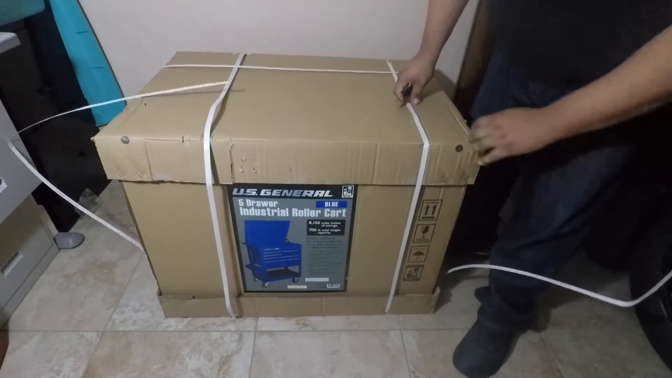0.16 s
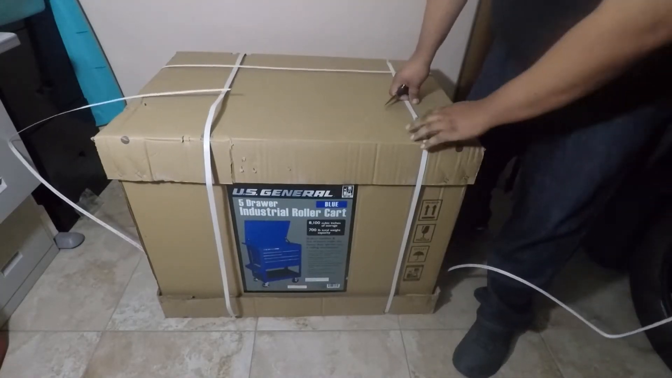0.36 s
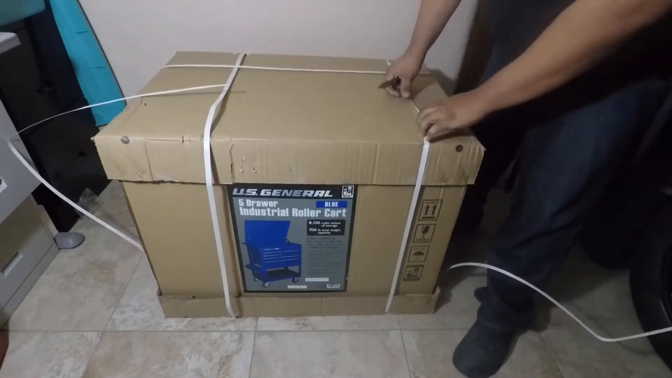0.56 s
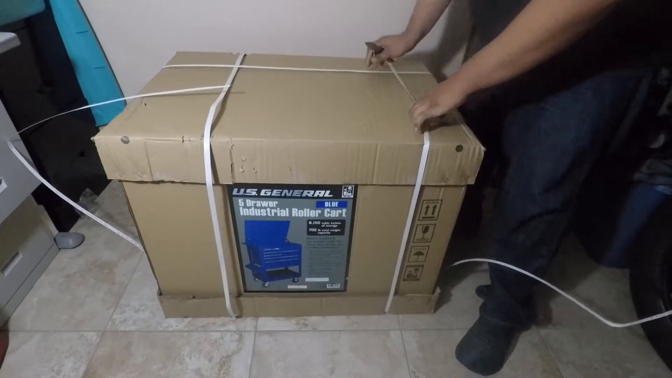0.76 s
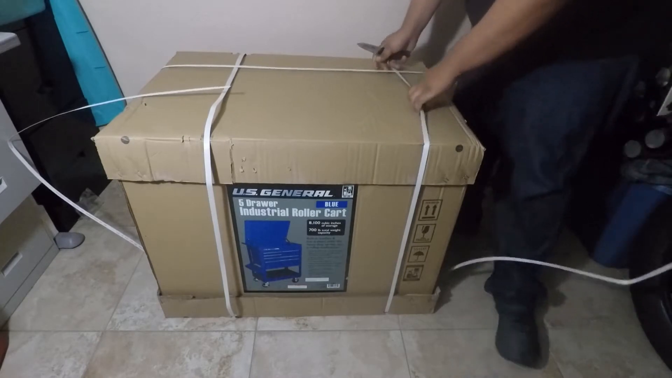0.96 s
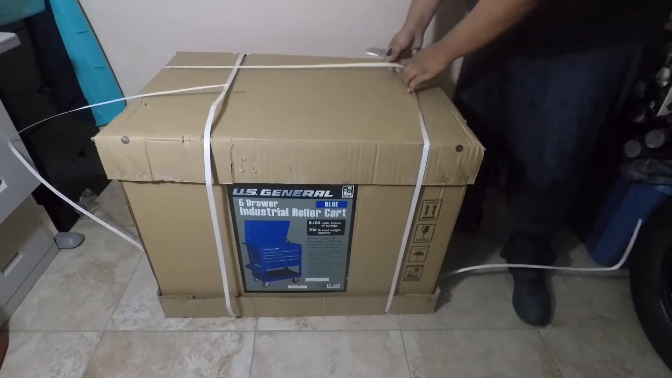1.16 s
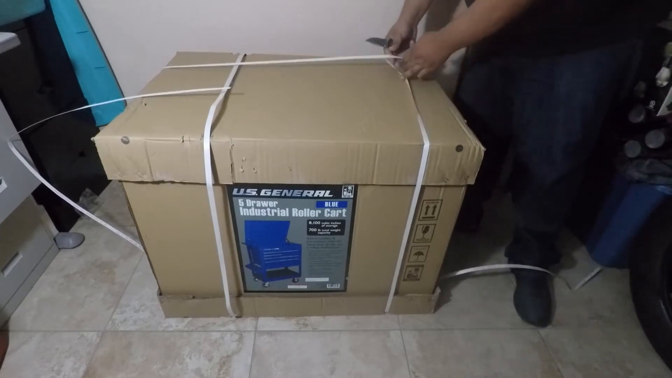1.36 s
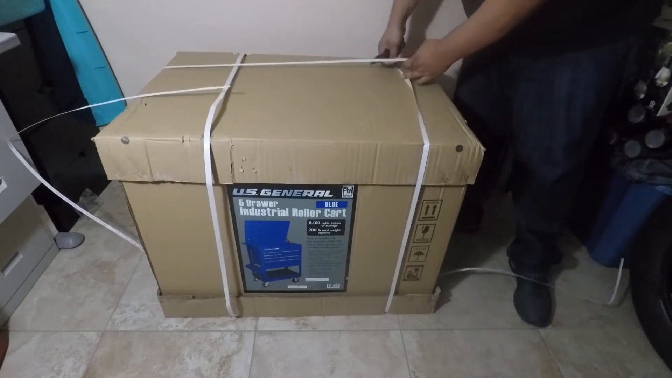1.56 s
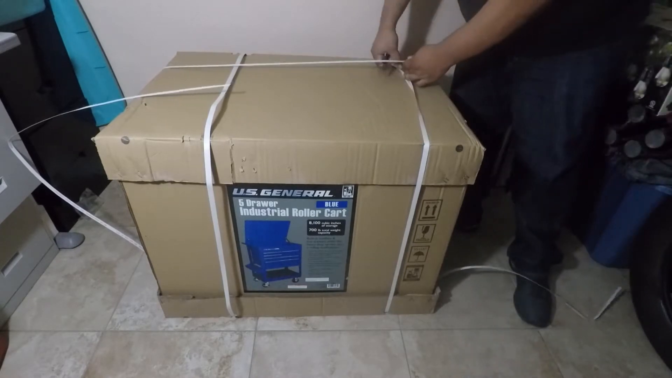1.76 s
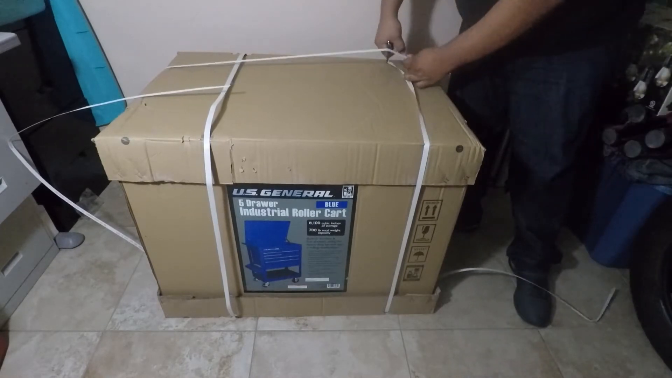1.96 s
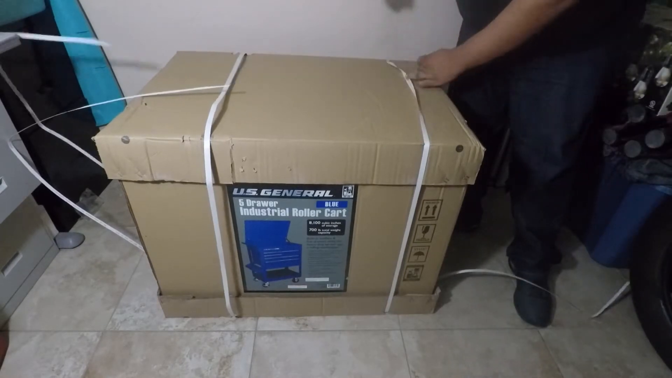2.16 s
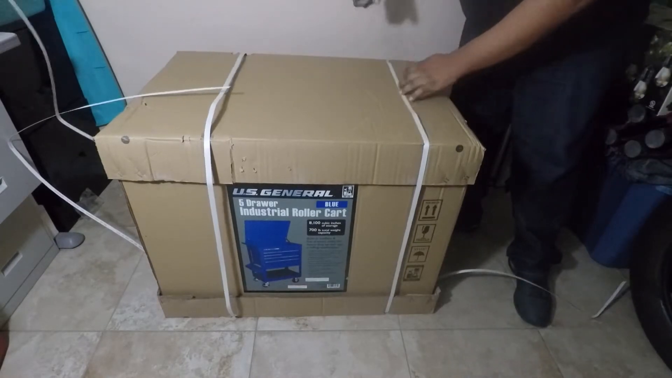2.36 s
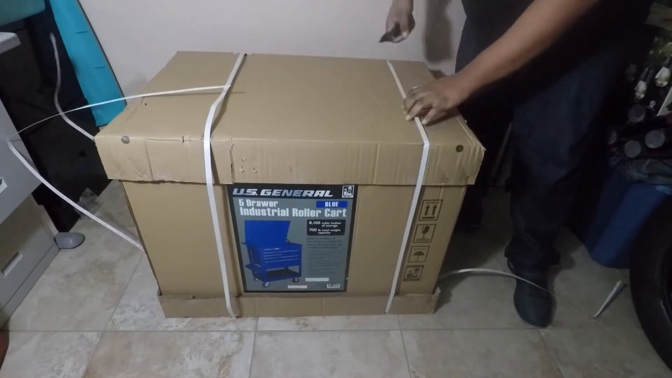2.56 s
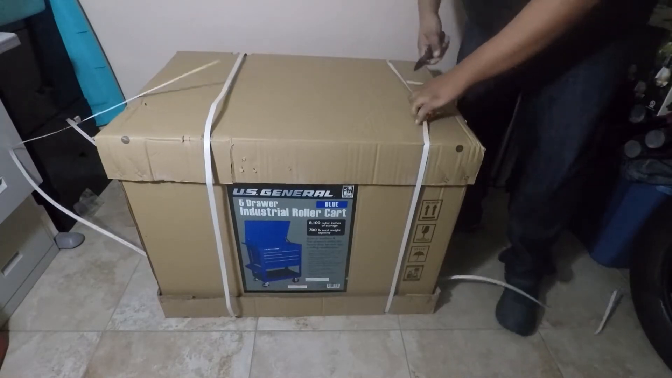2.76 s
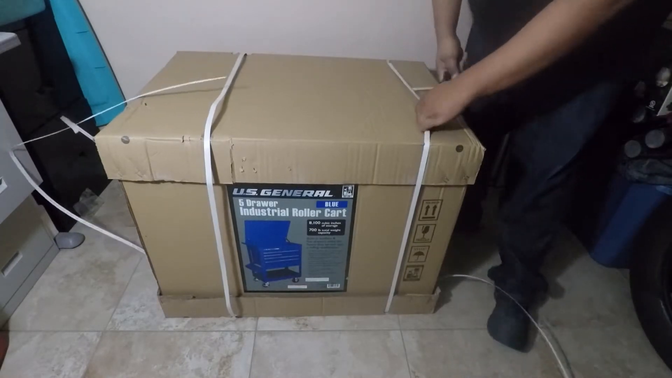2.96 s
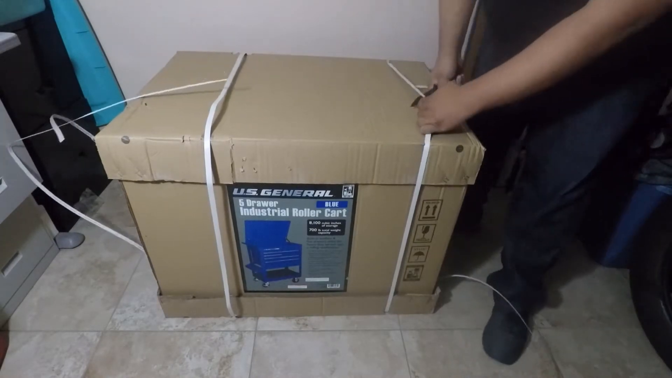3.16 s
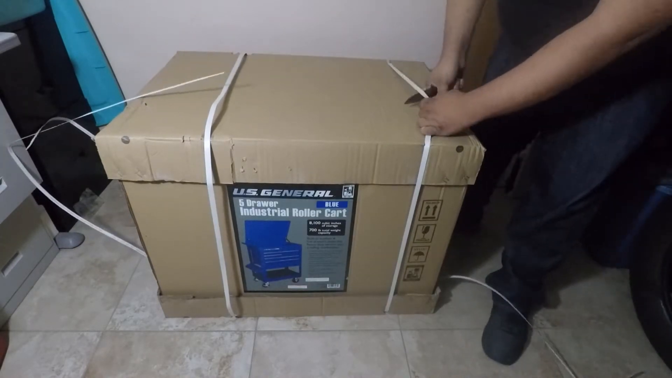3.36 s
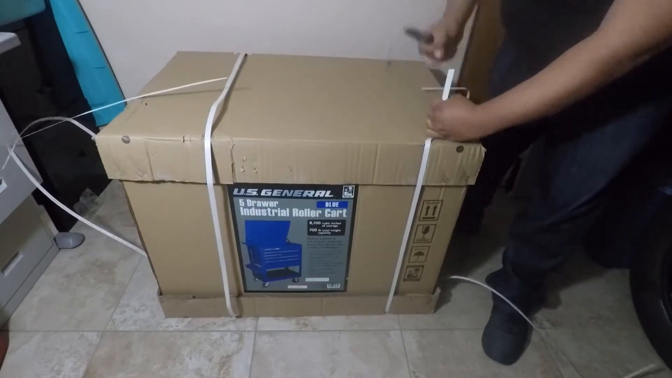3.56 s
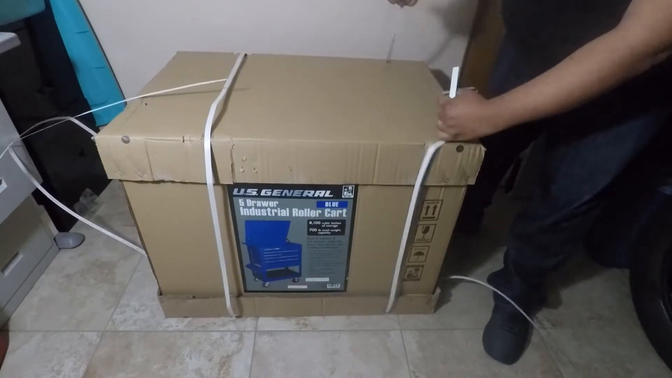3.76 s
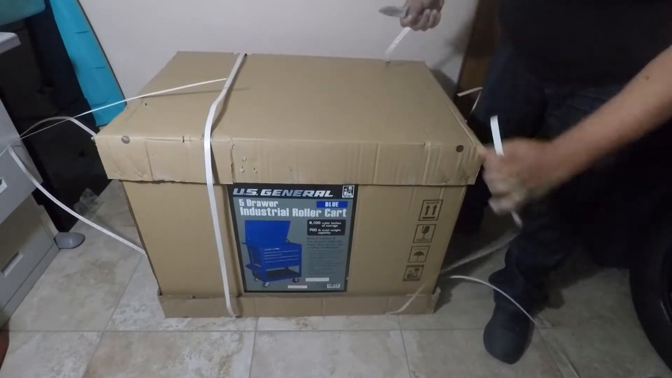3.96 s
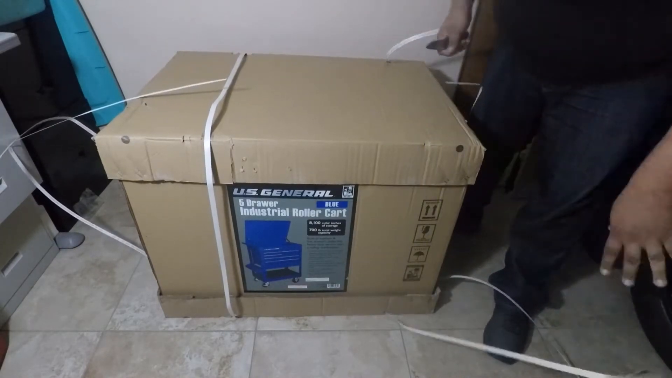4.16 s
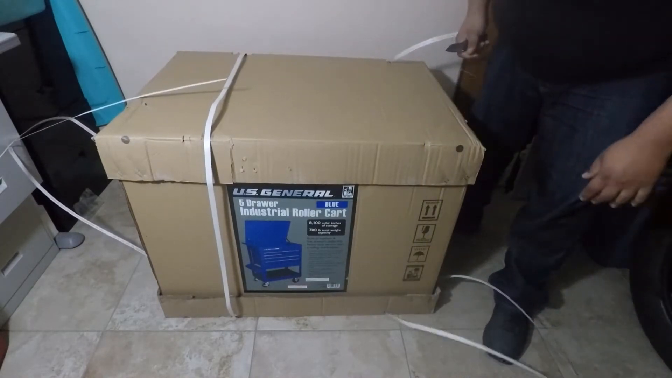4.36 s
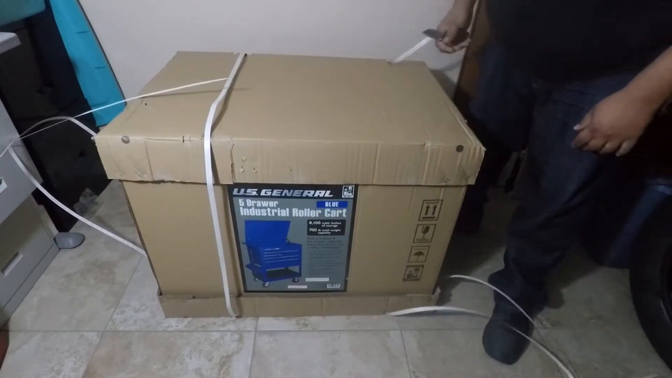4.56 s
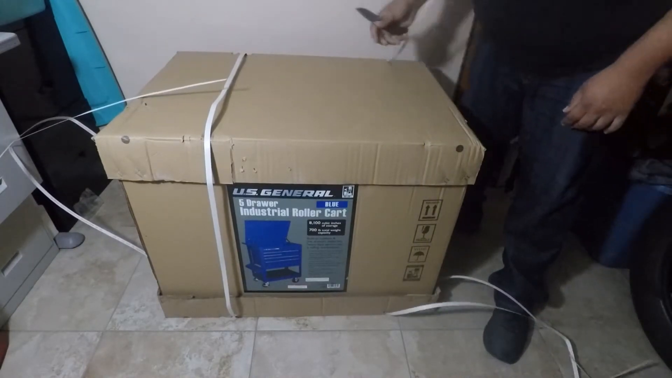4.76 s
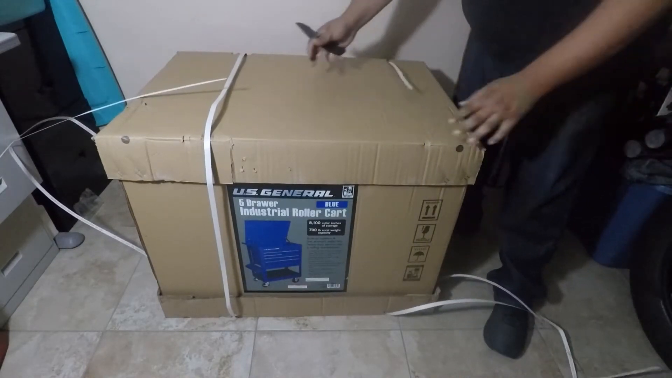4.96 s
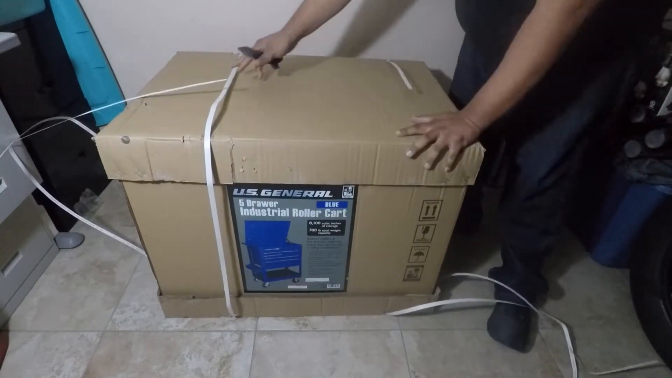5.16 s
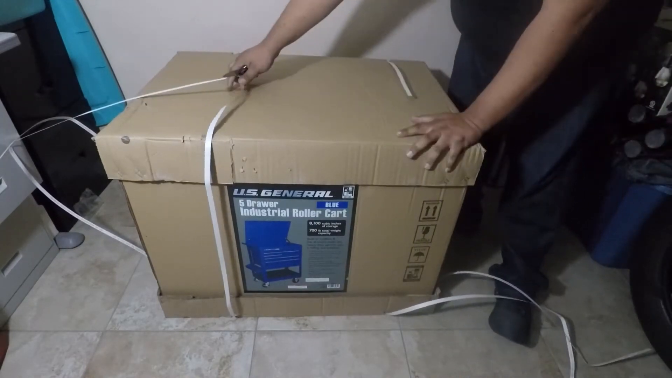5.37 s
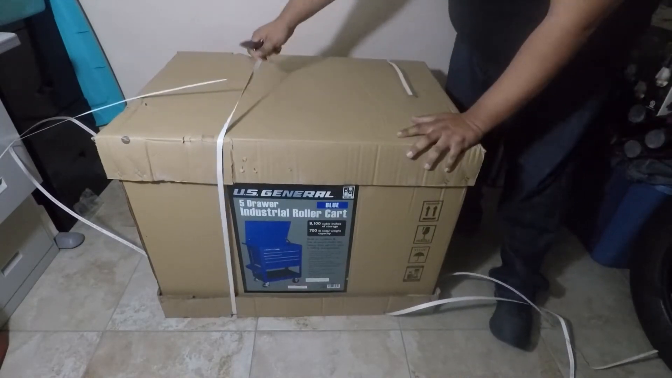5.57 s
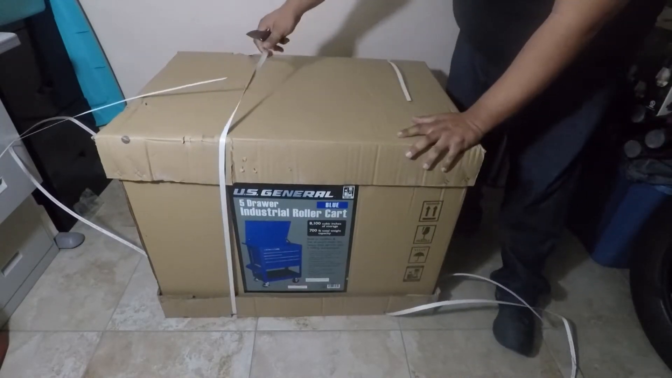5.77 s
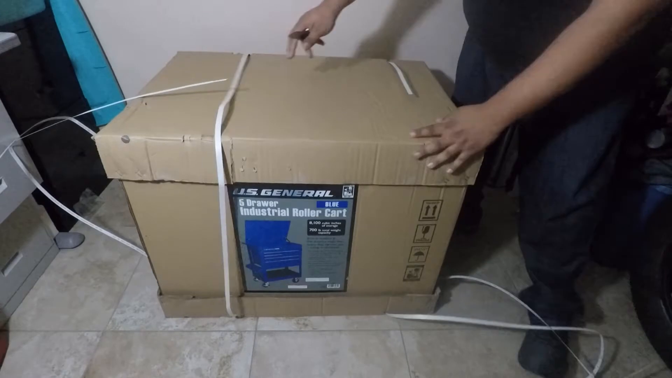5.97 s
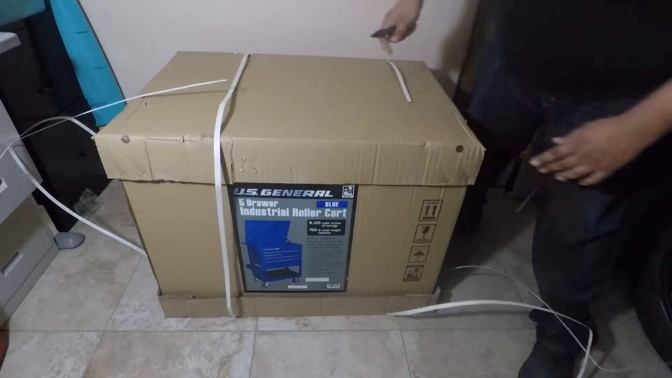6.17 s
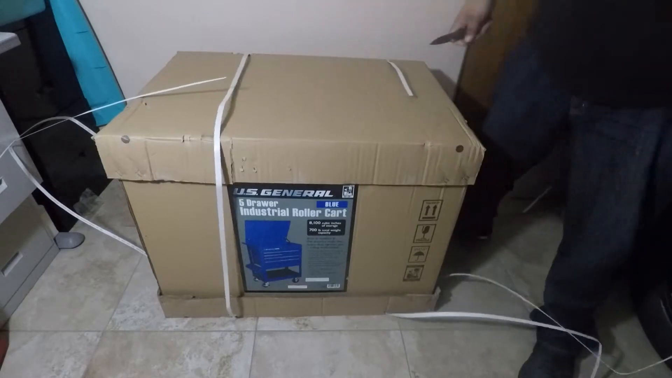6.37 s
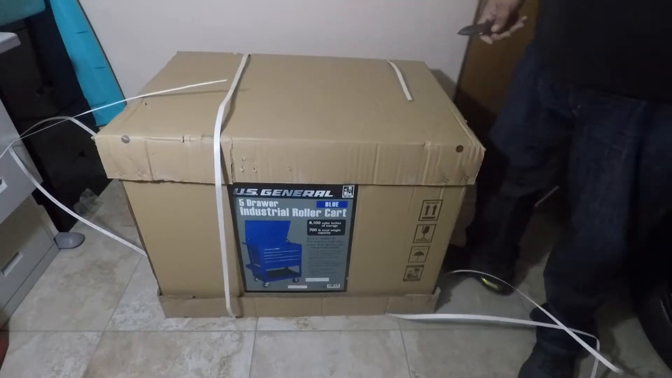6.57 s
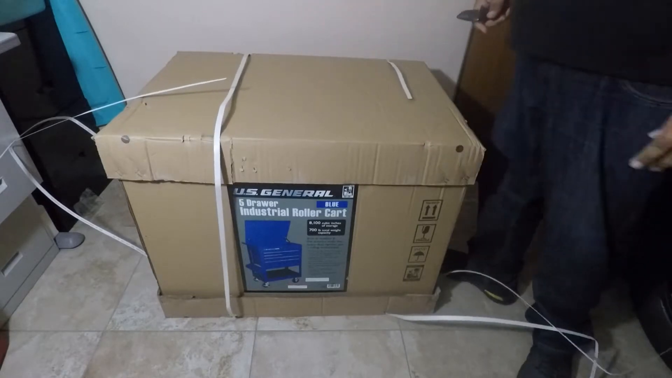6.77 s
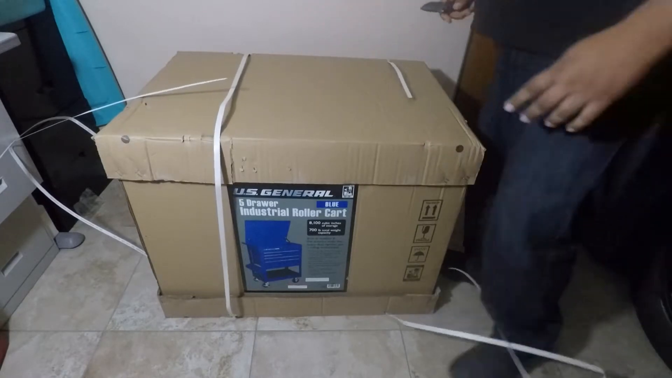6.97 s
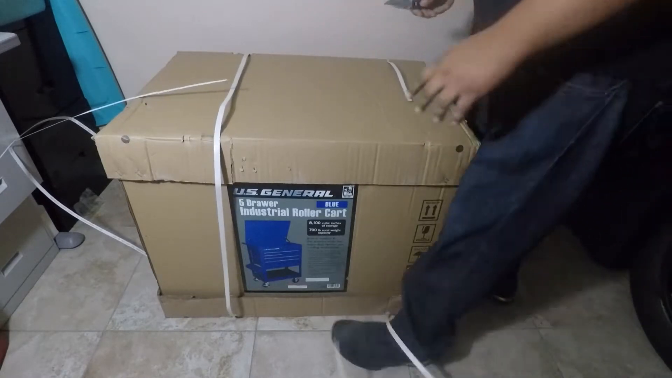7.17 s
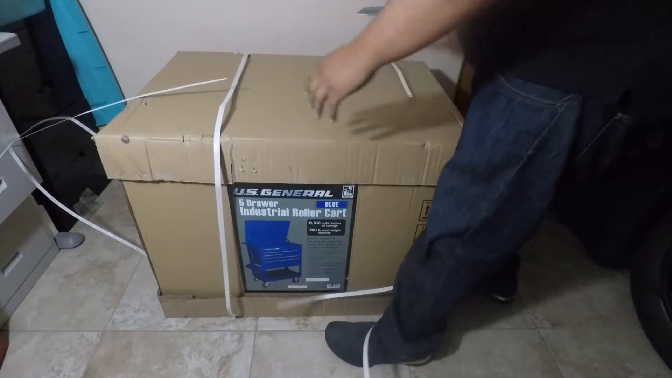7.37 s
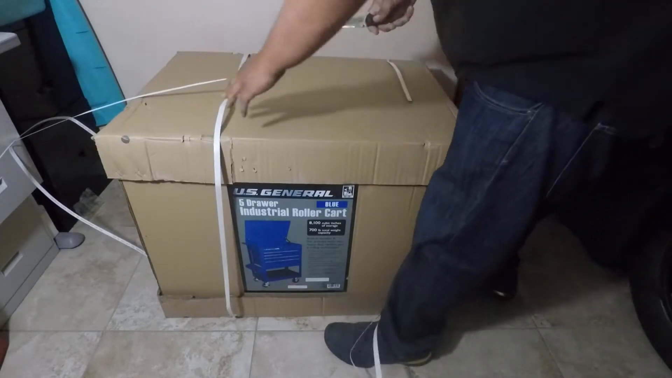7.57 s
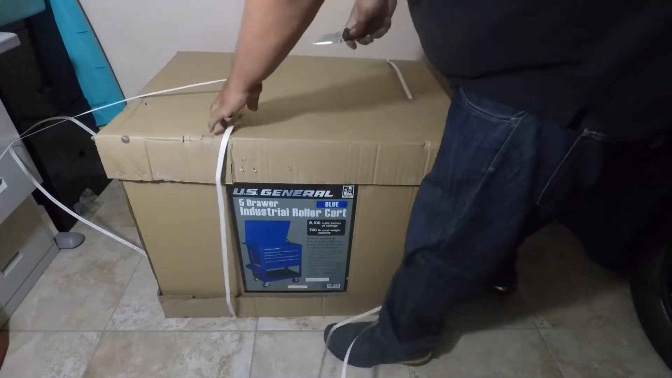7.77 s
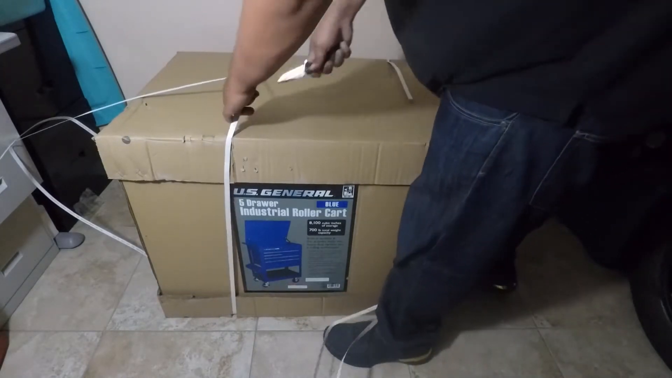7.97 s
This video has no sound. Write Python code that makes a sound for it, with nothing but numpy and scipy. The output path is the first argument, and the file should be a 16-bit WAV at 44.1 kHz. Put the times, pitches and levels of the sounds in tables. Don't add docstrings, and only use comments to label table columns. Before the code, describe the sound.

In a small tiled room, tight straps snap loudly off a big carton, which drums; loose ends thrum, tick and drag.

```python
import sys
import numpy as np
from scipy import signal
from scipy.fft import rfft, irfft
from scipy.io import wavfile
from scipy.ndimage import uniform_filter1d

SR = 44100
rng = np.random.default_rng(int(sys.argv[2]) if len(sys.argv) > 2 else 0)


def attenuation_scalar(level_db):
    decades = np.asarray(level_db, float) / 20
    return 10 ** decades


def materialize(psi):
    bounded = np.clip(np.atleast_2d(psi).T, -1, 1)
    quanta = np.round(bounded * 32767).astype(np.int16)
    wavfile.write(sys.argv[1], SR, quanta)


N = 353682

# (time [s], peak level [dB], box drumming [dB], sizzle [dB], crack centre [Hz])
STRAP_SNAPS = [
    (0.001, -21.5, -10.5, -10, 960),
    (2.0428, 0, -8.5, -15, 744),
    (2.0479, -0.5, -12, -25, 1250),
    (2.089, -9.5, -41, -12, 1210),
    (3.5237, 6.5, -18, -19.5, 960),
    (3.5285, -2.5, -10.5, -19, 2840),
    (3.614, -13, -15.5, -11, 1040),
    (5.119, -27.5, 0, -9.5, 1130),
    (5.635, -27, -17, -9.5, 2310),
    (5.919, -8, -13.5, -16, 1140),
]
# (time [s], peak level [dB], box drumming [dB], sizzle [dB], crack centre [Hz])
STRAP_WHIPS = [(2.366, -35.5, -20.5, -4.5, 5540), (5.907, -38.5, 1, -15, 1200), (5.919, -9, -14, -3, 1500),
               (5.9283, -24, -25, 7, 7000), (5.936, -30, -19.5, 6, 8000), (7.9687, -39, -15, -1, 5000),
               (1.344, -32, -7, -7.5, 5070), (2.657, -32, -13, -12, 4030), (3.314, -45.5, -25, 2, 7990),
               (3.914, -30, -5, -4, 2130), (4.323, -21, -24, -27, 3730), (4.631, -37.5, -21.5, -10, 3870),
               (4.906, -20, -21, -6, 5530), (4.945, -30.5, -12.5, -4, 795), (7.275, -38.5, -30, -6, 8080),
               (7.346, -14.5, -17.5, -8.5, 3100), (7.356, -15.5, -19, -30, 1530),
               (7.7568, -35, -8.5, 1, 640), (7.9175, -29, -25, -4, 3300), (4.936, -38, -20, 0, 6000),
               (5.018, -44, -20, 0, 6000), (1.329, -38, -20, 0, 6000)]
# (time [s], peak level [dB], box drumming [dB], sizzle [dB])
KNIFE_TAPS = [(1.319, -32.5, -6.5, -7), (1.705, -43, -23, -6), (1.735, -33, -15, -16),
              (1.753, -30, -13, -7.5), (2.372, -30, -12, -31), (2.813, -32, -15, -3),
              (3.752, -38, -10, -28), (3.797, -46, -13, 0), (5.093, -43, 1.5, -4), (5.267, -48, -2, -10),
              (5.323, -44.5, -0.5, 2), (6.674, -44, -11, -19), (7.125, -45.5, -10, -13.5)]
# (time [s], peak level [dB], box drumming [dB], sizzle [dB])
EDGE_CATCHES = [(0.8504, -38, 4, -3), (1.297, -46, -13, -16), (1.56, -33, -6.5, -20),
                (1.908, -46.5, -27, -0.5), (2.284, -31.5, -13, 0), (2.889, -36, -19, -3),
                (3.055, -41.5, -8, 2.5), (3.242, -44, -14.5, -4), (4.52, -40.5, -33.5, -2),
                (4.591, -46.5, -22, -2), (4.79, -52, -20, 5), (4.83, -41.5, -11.5, -23),
                (6.196, -44, -22, -18), (6.608, -37.5, -14.5, -9), (7.157, -38, -19.5, -26),
                (7.181, -36, -11, -22), (7.895, -49, 10.5, -17)]
# (time [s], peak level [dB], box drumming [dB], sizzle [dB], contact [ms])
FIBRE_NICKS = [(0.488, -41.5, -18, -1, 28), (1.974, -38, -10, -15, 11), (2.035, -35, -7.5, 2, 9.5),
               (2.429, -47.5, -18.5, 11, 18), (3.521, -33, -8.5, 0, 5.6), (4.316, -33.5, -21.5, -20, 2.9),
               (5.375, -50, -9.5, 12, 16), (5.425, -34, 2, -16, 21), (5.452, -43, -18, 13, 11),
               (5.897, -38.5, -8, -2, 10), (7.211, -41, -7, -25, 4.3), (7.265, -56, -15, 12.5, 37)]
SNAP_MS, WHIP_MS, TAP_MS, CATCH_MS = 2.67, 1.1, 1.6, 2.0
TAP_HZ, CATCH_HZ, NICK_HZ = 960, 1400, 1500
# (level under the blow [dB], reverberation [s])
BLOW_ECHO = [(-9, 0.21), (-15, 0.28), (-12, 0.13)]
# (frequency [Hz], level [dB], four times the ring [s])
BOX_MODES = [(63.2, -20, 0.18), (93.6, -2.5, 0.11), (186, 2, 0.1), (307, 1, 0.1), (480, 2.5, 0.072),
             (575, 1.5, 0.13), (700, -5, 0.098), (800, -2.5, 0.086), (971, -19, 0.2), (1090, -15, 0.21),
             (1337, -21, 0.26), (1160, -16, 0.19), (1408, -15, 0.32)]
# (time [s], peak level [dB], frequency [Hz], ring [s])
PANEL_RINGS = [(2.0435, -10, 468.5, .12), (2.044, -12, 581, .05), (2.045, -21, 700, 0.15),
               (2.045, -18, 1068, .18), (2.044, -17.5, 1254, 0.12), (2.043, -18, 2880, .035),
               (3.5245, -15.5, 784, 0.13), (3.5247, -15.5, 1126, 0.11), (3.525, -22, 1440, .18),
               (3.5249, -15.5, 2640, .08), (3.526, -20.5, 3190, .08), (3.525, -25, 3760, .08),
               (3.53, -21, 466, .15), (3.53, -20.5, 614, .15), (5.92, -21, 510, 0.1),
               (5.92, -21, 650, 0.087)]
# (time [s], peak level [dB], pitch [Hz], swell [ms], ring [s])
STRAP_THRUMS = [(0.403, -41.5, 168, 5.2, 0.093), (0.617, -45.5, 311, 21, 0.23),
                (0.853, -27.5, 272, 11, 0.066), (0.877, -22.5, 282, 4.4, 0.017),
                (2.046, -8, 298, 1.3, 0.089), (2.047, -11.5, 163, 6.4, 0.051), (2.049, -26, 59, 11, 0.25),
                (5.118, -35, 96, 8.2, 0.15), (2.17, -37, 172, 6.1, 0.8), (2.813, -34, 307, 4.8, 0.063),
                (3.528, -14, 100, 8.2, 0.083), (5.093, -33.5, 260, 11, 0.053), (5.12, -19, 270, 7.7, 0.015),
                (5.268, -33.5, 264, 8.8, 0.054), (5.382, -30.5, 267, 3, 0.053),
                (5.4523, -17, 237.5, 4, 0.12), (5.456, -10.5, 246, 16, 0.03), (5.487, -27, 272, 5.6, 0.14),
                (5.92, -8.5, 300, 1.5, 0.039), (5.934, -20.5, 307, 8, 0.19), (3.532, -12, 215, 5.6, 0.11),
                (7.757, -36, 268, 5, 0.045)]
THRUM_SAG_PER_S = .2
# (time [s], peak level [dB], centre [Hz], width [Hz], dying [s])
STIFF_RINGS = [(4.323, -21, 7970, 1700, 0.36), (7.346, -18.5, 4000, 490, 0.14),
               (7.345, -18.5, 2360, 500, 0.1), (7.346, -23, 1470, 400, 0.2), (7.346, -24.5, 660, 330, 0.17),
               (3.914, -39, 2200, 330, 0.23), (5.2, -39, 760, 450, .12), (1.561, -35, 3880, 610, 0.23),
               (2.4, -57, 6300, 1500, 0.11), (7.158, -39.5, 1430, 570, 0.14),
               (2.044, -13.5, 1230, 300, 0.37), (3.525, -12, 780, 410, 0.19), (7.35, -28, 2700, 4300, .6),
               (4.93, -40, 770, 600, .2), (3.8, -26, 800, 750, 0.32), (4.323, -32.5, 2530, 660, 0.2)]
# (time [s], peak level [dB], centre [Hz], swell [ms], dying [s])
STRAP_CHATTERS = [(.56, -33, 5430, 3, 0.13), (.56, -39, 8060, 5, .1), (.59, -41.5, 843, 23, 0.33),
                  (.505, -45, 1300, 9, 0.25), (.872, -43, 8500, 8, .12), (1.1, -41, 4470, 8, 0.14),
                  (2.231, -38, 7000, 8, .12), (2.283, -35.5, 7550, 4, 0.086), (2.44, -34.5, 7800, 10, .12),
                  (2.655, -38.5, 5450, 7, 0.11), (2.664, -38.5, 3480, 12, 0.14), (2.64, -38, 800, 23, 0.27),
                  (2.887, -42, 3040, 4, 0.23), (5.376, -37, 9440, 7, 0.073), (5.452, -30, 6600, 3, 0.22),
                  (5.452, -30, 9900, 2, 0.082), (5.458, -31, 8260, 8.5, 0.09), (6.195, -50, 500, 3, .08),
                  (7.18, -43, 650, 5, .15), (7.2, -50, 2530, 8.8, 0.17), (7.745, -48.5, 12100, 7.1, 0.055),
                  (7.787, -41.5, 5600, 12, .25), (7.8, -44, 7800, 15, .2), (7.79, -45.5, 13000, 8.7, 0.18),
                  (7.893, -43, 600, 4, .08), (.85, -34, 420, 6, .2), (.876, -36, 480, 4, .06),
                  (.405, -43, 300, 6, .15), (5.119, -29, 450, 3, .18), (5.125, -33, 170, 8, .25),
                  (6.674, -44, 720, 3, .08), (4.04, -52, 6500, 5, .06), (4.18, -59, 10200, 30, .6),
                  (6.9, -56, 12000, 25, .3), (6.35, -57, 7500, 20, .25), (7.27, -42, 9500, 6, .25),
                  (2.045, -16, 190, 5, .2), (2.06, -22, 1200, 15, .5), (3.83, -46, 4100, 10, .3),
                  (7.87, -41, 150, 20, .4)]
CHATTER_WIDTH = 0.32
# (full speed from [s], held [s], level [dB], sizzle [dB])
STRAP_SLIDES = [(.25, 0.27, -61.5, -1), (0.431, .06, -55, -1), (.5, 0.11, -49, -3), (.76, 0.09, -58, 1),
                (.875, 0.17, -46.5, 2), (1.05, 0.077, -48.5, 5), (1.16, 0.06, -52.5, 1.5),
                (1.3, 0.11, -57, -11), (1.52, 0.054, -57.5, -2), (1.76, 0.024, -52.5, -6),
                (1.99, 0.021, -45, -13), (2.12, 0.14, -38.5, -6.5), (2.33, 0.051, -50, -7),
                (2.43, 0.14, -47, 1.5), (2.6, 0.041, -50.5, 1), (2.75, 0.034, -52.5, 4),
                (2.669, 0.015, -42, -3), (2.808, 0.014, -42.5, -1), (3.24, 0.13, -61.5, -4),
                (3.48, 0.033, -55.5, -4), (3.66, 0.046, -43.5, -12), (3.8, 0.011, -49.5, -1),
                (4.6, .05, -59.5, -0.5), (4.72, 0.079, -62, -4), (5.03, 0.011, -53, -13),
                (5.1, 0.088, -52.5, -3), (5.392, 0.084, -46.5, 5), (5.599, 0.043, -46.5, -2.5),
                (5.799, 0.019, -47, -5.5), (5.91, 0.13, -46.5, 4), (6.62, 0.041, -56.5, 0.5),
                (7.2, 0.16, -55.5, -2.5), (7.49, .16, -56, -10), (7.78, 0.26, -52, -2.5)]
# (full weight from [s], held [s], level [dB])
PALM_RUBS = [(.08, 0.018, -51), (.33, 0.074, -57.5), (.43, 0.22, -49.5), (.68, 0.059, -62),
             (.87, 0.038, -37.5), (.97, 0.081, -44.5), (1.15, 0.25, -52), (1.77, 0.036, -45),
             (1.95, 0.079, -54.5), (2.15, 0.21, -43.5), (2.45, 0.12, -51.5), (2.58, 0.29, -45),
             (2.81, 0.012, -37.5), (3.04, 0.028, -56), (3.25, 0.012, -45.5), (3.45, .05, -56.5),
             (3.79, 0.01, -45), (4.7, 0.16, -64), (5.15, 0.058, -56), (5.27, 0.088, -51),
             (5.41, 0.061, -38.5), (5.55, 0.069, -46), (5.8, 0.069, -51), (6.19, .012, -57.5),
             (6.67, 0.01, -53.5), (6.8, .02, -59), (7.27, 0.047, -59), (7.52, 0.12, -59), (7.8, 0.024, -45),
             (7.85, 0.13, -47.5)]
# (full weight from [s], held [s], level [dB])
FOOT_SHIFTS = [(.24, 0.068, -60), (.42, 0.068, -50), (.87, .05, -59), (1.02, 0.17, -60), (1.26, 0.14, -54),
               (1.55, 0.082, -63), (1.8, .2, -66), (2.15, 0.08, -43), (2.42, .1, -56), (2.62, .25, -54),
               (3.22, 0.12, -63.5), (3.5, 0.23, -52), (3.9, 0.11, -63), (4.2, .1, -69.5), (5.1, 0.11, -43),
               (5.32, .2, -49.5), (5.6, .15, -50), (5.8, 0.28, -58), (6.2, 0.04, -61.5),
               (6.35, 0.071, -59.5), (4.05, .05, -62.5), (4.4, 0.075, -65), (6.62, .06, -70),
               (6.88, 0.088, -65.5), (7.17, .08, -64), (7.37, 0.11, -60), (7.62, .08, -64),
               (7.74, 0.045, -51), (7.85, .17, -53)]
# (rise [dB per s], fall [dB per s], idle level [dB])
SLIDE_SWELL = (350, 150, -69)
RUB_SWELL = (280, 350, -71)
STEP_SWELL = (300, 190, -76)
PALM_HISS_DB, IDLE_SIZZLE_DB = -9.5, -9
# (frequency [Hz], level [dB per Hz])
CARD_SPECTRUM = [(350, -27.5), (600, -1), (877, -2), (1070, -7.5), (1440, -3), (1770, -7.5), (4090, -7),
                 (4650, -13.5), (8000, -15.5), (10400, -34.5), (17600, -120)]
# (frequency [Hz], level [dB per Hz])
SIZZLE_SPECTRUM = [(3000, -30), (6000, -3), (8000, -4), (10000, -6), (12000, -11.5), (15000, -9)]
# (frequency [Hz], reverberation [s], level [dB])
ROOM_BANDS = [(133.8, 1, 0.5), (251.6, 0.88, 3), (510, 0.41, -0.5), (1040, 0.6, 0), (2160, 0.6, -1),
              (4000, 0.33, -1), (8260, 0.25, -1), (14000, 0.18, -3)]
ROOM_DB, FIRST_ECHO_MS = -11, 1.3
# (frequency [Hz], level [dB per Hz])
AIR_SPECTRUM = [(12, -29.5), (20, -1.5), (33, -23), (64, -23), (115, -31.5), (264, -23.5), (321, -32.5),
                (1700, -37), (5600, -39), (7810, -37), (9220, -43), (15200, -43)]
AIR_DB = -60.5
SWAY_HZ, SWAY_DB = 8, -61
MIC_HZ, MIC_WIDTH_HZ, MIC_DB = 1463, 77, 3


def band(x, hz, width_hz):
    hz = min(hz, SR * .4)
    return signal.lfilter(*signal.iirpeak(hz, hz / width_hz, fs=SR), x)


def band_twice(x, hz, width_hz):
    return band(band(x, hz, width_hz), hz, width_hz)


def ring(x, hz, t60):
    pole = np.exp(2j * np.pi * hz / SR - np.log(1000) / (t60 * SR))
    return signal.lfilter([1], [1, -pole], x).imag


def peak(x, db):
    return attenuation_scalar(db) * x / np.abs(x).max()


def add(bus, s, x):
    i = int(s * SR)
    bus[i:i + len(x)] += x[:N - i]


def swell_and_die(t, swell_ms, t60):
    swell = max(swell_ms, 1) / 1000
    fall = attenuation_scalar(-60 * (t - swell) / max(t60, .01))
    return np.where(t < swell, t / swell, fall)


def contacts():
    rows = [(*r, SNAP_MS) for r in STRAP_SNAPS]
    rows += [(*r, WHIP_MS) for r in STRAP_WHIPS]
    rows += [(*r, TAP_HZ, TAP_MS) for r in KNIFE_TAPS]
    rows += [(*r, CATCH_HZ, CATCH_MS) for r in EDGE_CATCHES]
    rows += [(*r[:4], NICK_HZ, r[4]) for r in FIBRE_NICKS]
    return rows


def box(blow):
    modes = enumerate(BOX_MODES)
    return sum((-1) ** k * attenuation_scalar(db) * ring(blow, hz, 0.25 * t60) for k, (hz, db, t60) in modes)


def snaps():
    rows = contacts()
    t = np.arange(SR // 3) / SR
    noise = rng.standard_normal((len(rows), 3, len(t)))
    build_up = 1 - np.exp(-t / 0.0055)
    echoes = np.array([attenuation_scalar(db - 60 * t / t60) * build_up for db, t60 in BLOW_ECHO])
    out = np.zeros(N)
    for (s, db, box_db, sizzle_db, hz, ms), grit in zip(rows, noise):
        contact = max(ms, .2) / 1000 * np.array([[3.0], [1], [.8]])
        decay = np.maximum(np.exp(-t / contact), echoes * np.sqrt(ms / 2))
        onset = 1 - np.exp(-t / (0.14 * contact))
        low, mid, high = grit * decay * onset
        knock = band(band(low, 300, 600), 410, 800) + attenuation_scalar(-32) * box(low)
        crack = band_twice(mid, hz, 1.1 * hz)
        crack = crack + .5 * band(band(mid, 2200, 4000), 2200, 6000)
        sizzle = band(band(high, 6500, 6200), 6000, 9600) + attenuation_scalar(-8) * band(high, 14000, 3500)
        blow = peak(crack, db - 2.0)
        blow += peak(knock, db + box_db + 4.0)
        blow += peak(sizzle, db + sizzle_db + 2.5)
        add(out, s, blow)
    return out


def panels():
    out, t = np.zeros(N), np.arange(SR // 3) / SR
    for s, db, hz, t60 in PANEL_RINGS:
        turn = 2 * np.pi * hz * t
        pair = np.sin(turn) + 0.31 * np.sin(1.045 * turn)
        first_cycle = np.minimum(t * hz, 1)
        add(out, s, attenuation_scalar(db - 60 * t / t60) * first_cycle * pair)
    return out


def thrums():
    out, t = np.zeros(N), np.arange(SR // 2) / SR
    for s, db, hz, swell_ms, t60 in STRAP_THRUMS:
        shape = swell_and_die(t, swell_ms, t60)
        turn = 2 * np.pi * hz * (t - THRUM_SAG_PER_S * t ** 2 / 2)
        swing = np.sin(turn) + .15 * shape * np.sin(1.9 * turn)
        add(out, s, attenuation_scalar(db) * shape * swing)
    return out


def rings():
    out, t = np.zeros(N), np.arange(SR // 3) / SR
    noise = rng.standard_normal((len(STIFF_RINGS), len(t)))
    for (s, db, hz, width_hz, t60), grit in zip(STIFF_RINGS, noise):
        tick, shimmer = np.exp(-t / .0015), .17 * attenuation_scalar(-60 * t / t60)
        burst = grit * np.maximum(tick, shimmer)
        add(out, s, peak(band_twice(burst, hz, width_hz), db))
    return out


def chatters():
    out, t = np.zeros(N), np.arange(SR // 3) / SR
    noise = rng.standard_normal((len(STRAP_CHATTERS), len(t)))
    for (s, db, hz, swell_ms, t60), grit in zip(STRAP_CHATTERS, noise):
        burst = grit * swell_and_die(t, swell_ms, t60)
        add(out, s, peak(band_twice(burst, hz, CHATTER_WIDTH * hz), db))
    return out


def colour(x, table):
    hz, db = np.transpose(table)
    place = np.log(np.fft.rfftfreq(len(x), 1 / SR) + 1)
    gain = attenuation_scalar(np.interp(place, np.log(hz), db, left=-80))
    return irfft(rfft(x) * gain, len(x)) / np.sqrt(np.mean(gain ** 2))


def grains(per_s, spread_db, bed):
    hits = rng.random(N) < per_s / SR
    clicks = hits * rng.standard_normal(N) * attenuation_scalar(spread_db * rng.exponential(size=N))
    x = bed * rng.standard_normal(N) + clicks / clicks.std()
    return x / x.std()


def flicker(count, depth_db):
    steps = np.repeat(rng.standard_normal(N // count + 1), count)
    return attenuation_scalar(depth_db * uniform_filter1d(steps, size=count)[:N])


def patchy(x, depth_db):
    hz = 250 * 2 ** np.arange(7)
    spectrum, place = rfft(x), np.log2(np.fft.rfftfreq(N, 1 / SR) + 1)
    shares = [np.interp(place, np.log2(hz), row) for row in np.eye(len(hz))]
    return sum(flicker(count=500, depth_db=depth_db) * irfft(spectrum * share, N) for share in shares)


def strokes(rows, shape):
    rise, fall, idle_db = shape
    t = np.arange(N) / SR
    out = np.full(N, float(idle_db))
    for s, held, db in rows:
        before, after = np.maximum(s - t, 0), np.maximum(t - s - held, 0)
        out = np.maximum(out, db - rise * before - fall * after)
    return out


def scrape():
    hum = attenuation_scalar(strokes(PALM_RUBS, RUB_SWELL))
    thud = attenuation_scalar(strokes(FOOT_SHIFTS, STEP_SWELL))
    slide = attenuation_scalar(strokes([r[:3] for r in STRAP_SLIDES], SLIDE_SWELL))
    hiss = np.hypot(slide, attenuation_scalar(PALM_HISS_DB) * hum)
    rise, fall, idle_db = SLIDE_SWELL
    fizz_rows = [(s, held, db + sizzle_db) for s, held, db, sizzle_db in STRAP_SLIDES]
    fizz = attenuation_scalar(strokes(fizz_rows, (rise, fall, idle_db + IDLE_SIZZLE_DB)))
    slip = flicker(count=1500, depth_db=1.4)
    grit = grains(2500, 1.1, 1.7)
    rub = grains(900, 1.2, 1.3)
    drum = band_twice(rub, 380, 500) + attenuation_scalar(-31.5) * box(rub)
    feet = band(band(rng.standard_normal(N), 54, 29), 60, 52)
    edge = hiss * colour(grit, CARD_SPECTRUM) + fizz * colour(grit, SIZZLE_SPECTRUM)
    edge = slip * patchy(edge, depth_db=2.5)
    card = hum * slip * flicker(count=2500, depth_db=0.5) * drum / drum.std()
    floor = thud * flicker(count=4000, depth_db=2.0) * feet / feet.std()
    return attenuation_scalar(-4.5) * (edge + card), attenuation_scalar(-3) * floor


def room(x):
    t = np.arange(int(.7 * SR)) / SR
    tail = np.zeros(len(t))
    for hz, t60, db in ROOM_BANDS:
        tail += attenuation_scalar(db - 60 * t / t60) * band(rng.standard_normal(len(t)), hz, hz * 0.39)
    tail *= np.clip(1000 * t / FIRST_ECHO_MS - .5, 0, 1)
    return attenuation_scalar(ROOM_DB) * signal.fftconvolve(x, tail / np.sqrt(np.sum(tail ** 2)))[:N]


def air():
    tone = colour(rng.standard_normal(N), AIR_SPECTRUM)
    fan = band_twice(rng.standard_normal(N), 1300, 220)
    sway = band_twice(rng.standard_normal(N), SWAY_HZ, 7)
    still = attenuation_scalar(AIR_DB - 2.0) * (tone + attenuation_scalar(-18.0) * fan / fan.std())
    return still + attenuation_scalar(SWAY_DB) * sway / sway.std()


def scene():
    drag, feet = scrape()
    thrum = thrums()
    walls = room(drag + attenuation_scalar(-27) * thrum)
    blows = snaps() + rings() + chatters() + panels()
    return (blows + thrum + drag + walls + feet + air())[None]


def roll_off(x):
    return signal.sosfilt(signal.butter(12, 16480, fs=SR, output="sos"), x)


def record(dry):
    x = dry + (attenuation_scalar(MIC_DB) - 1) * band(dry, MIC_HZ, MIC_WIDTH_HZ)
    rounded = 0.92 * np.tanh(x / 0.9)
    top_cut = signal.ellip(8, .3, 40, 15420, fs=SR, output="sos")
    return roll_off(signal.sosfilt(top_cut, rounded))


dry = scene()
out = record(dry)
materialize(out)
```